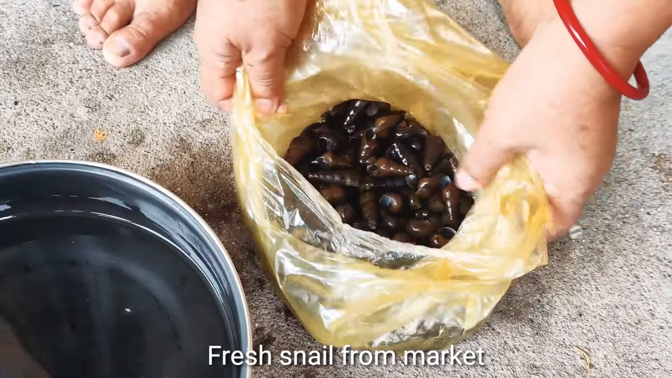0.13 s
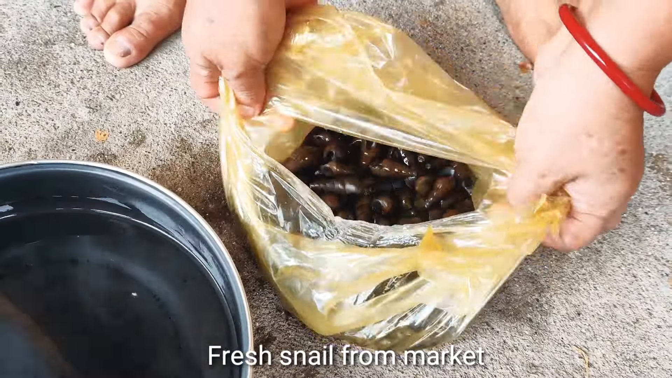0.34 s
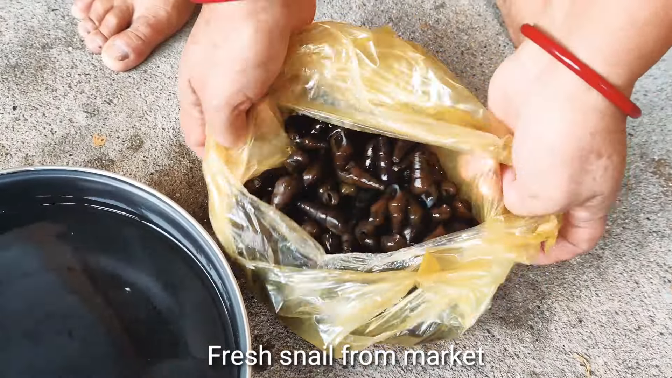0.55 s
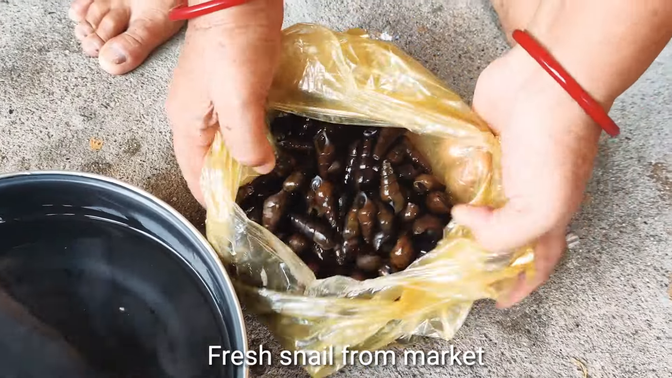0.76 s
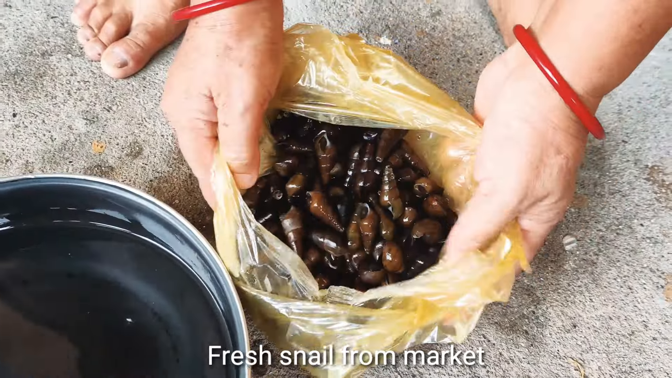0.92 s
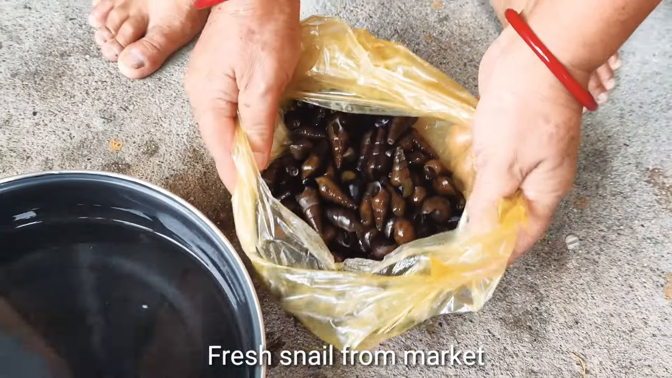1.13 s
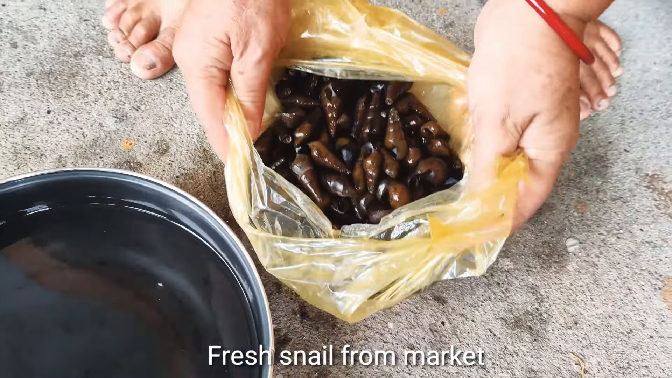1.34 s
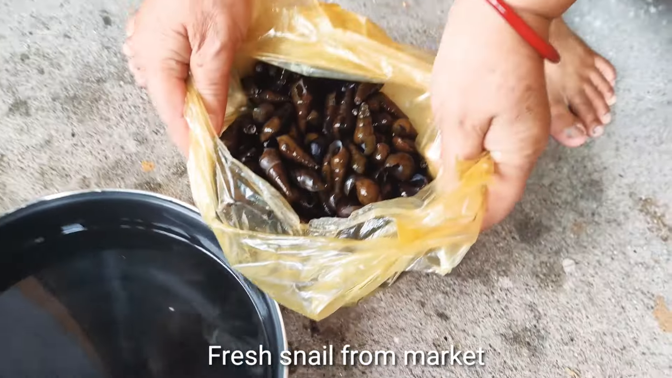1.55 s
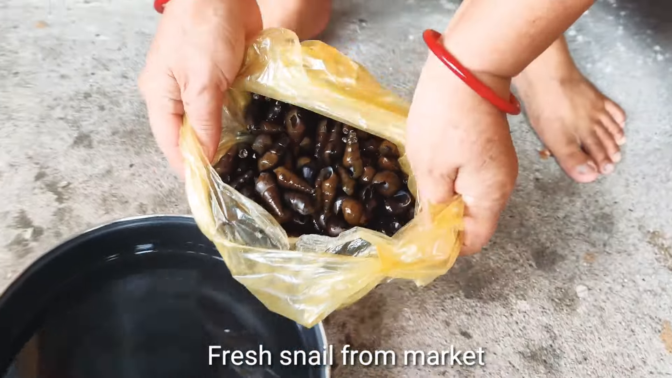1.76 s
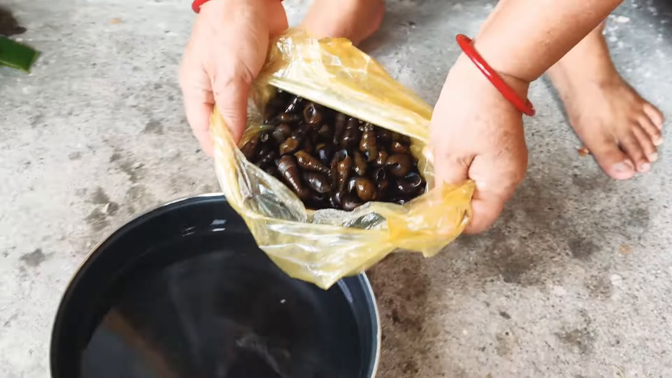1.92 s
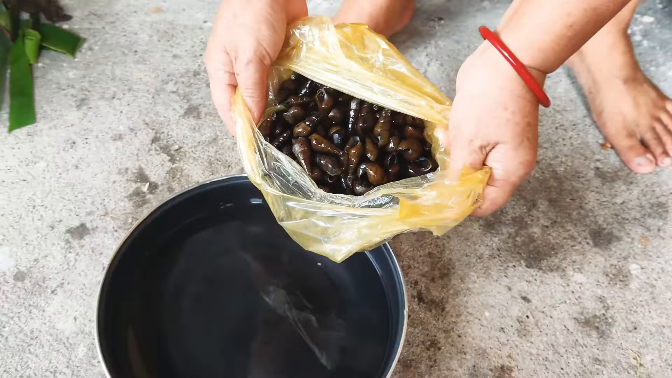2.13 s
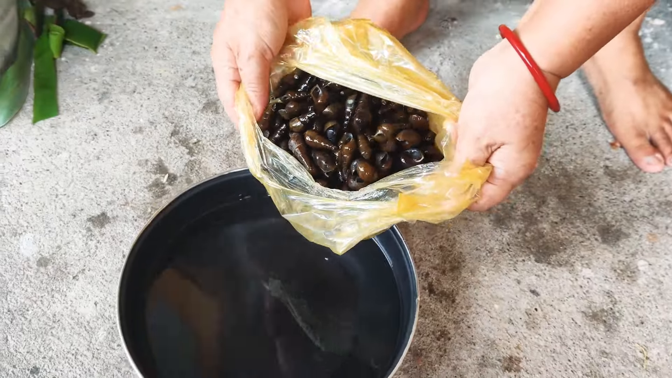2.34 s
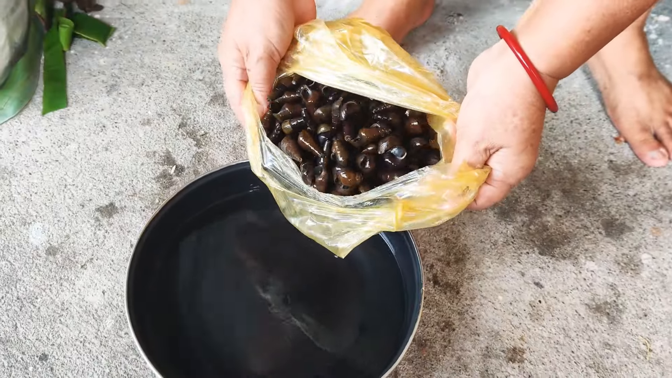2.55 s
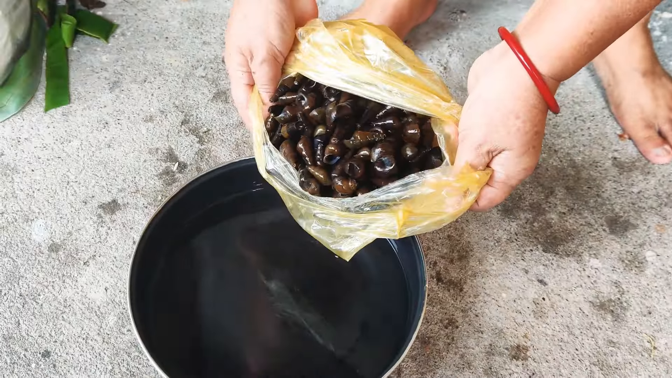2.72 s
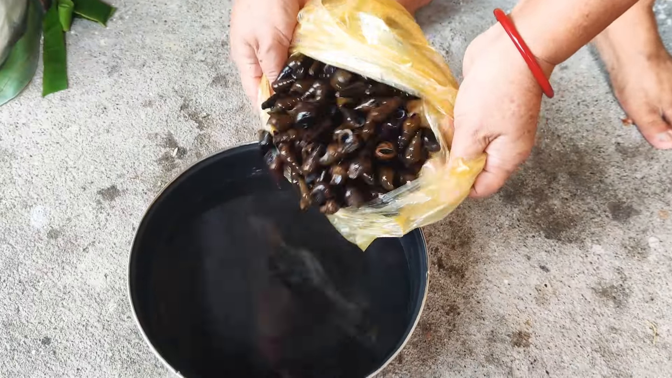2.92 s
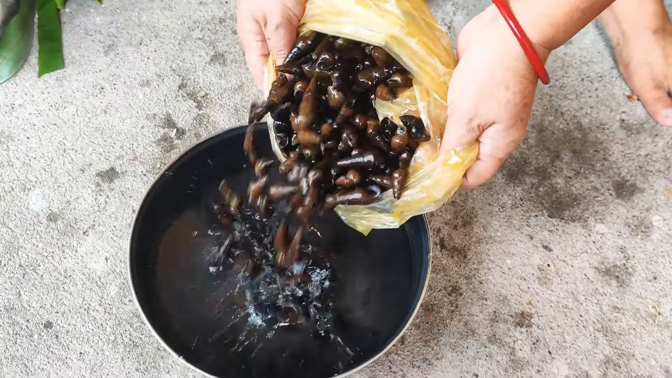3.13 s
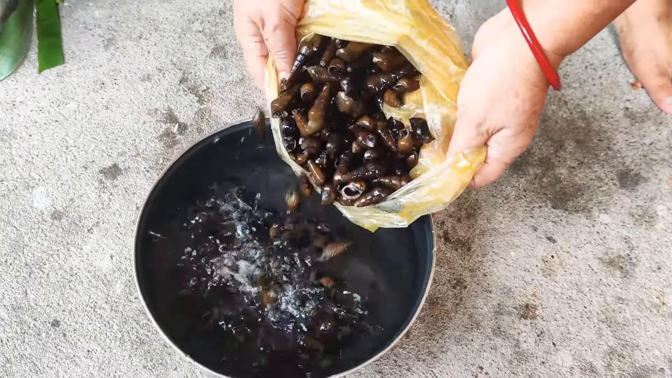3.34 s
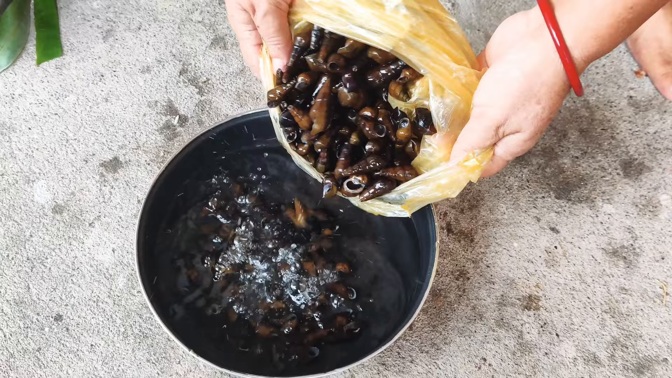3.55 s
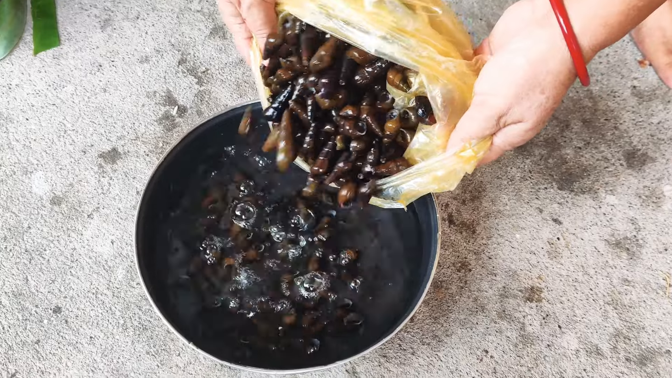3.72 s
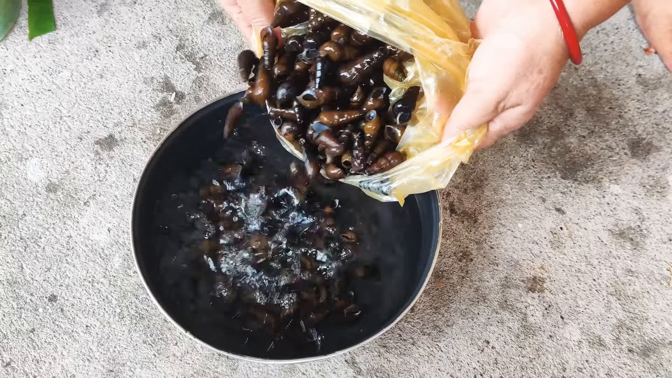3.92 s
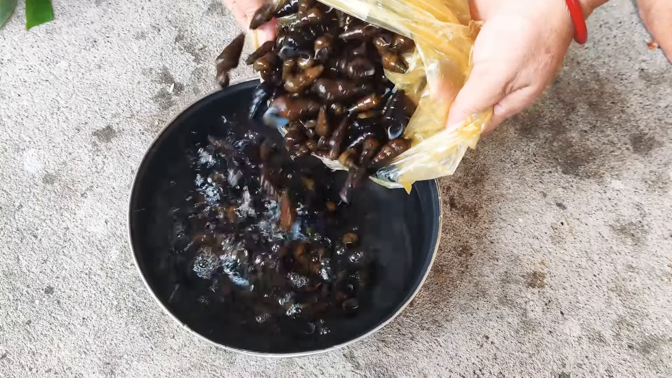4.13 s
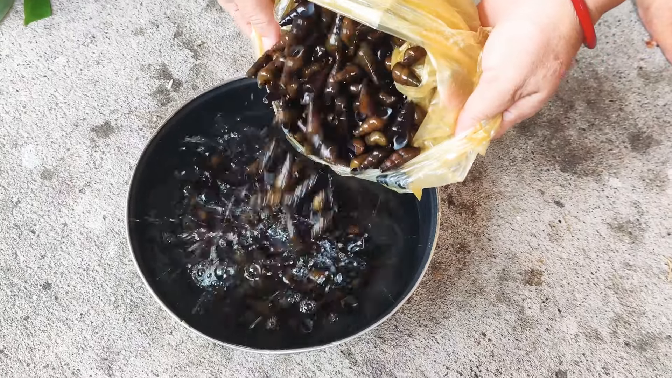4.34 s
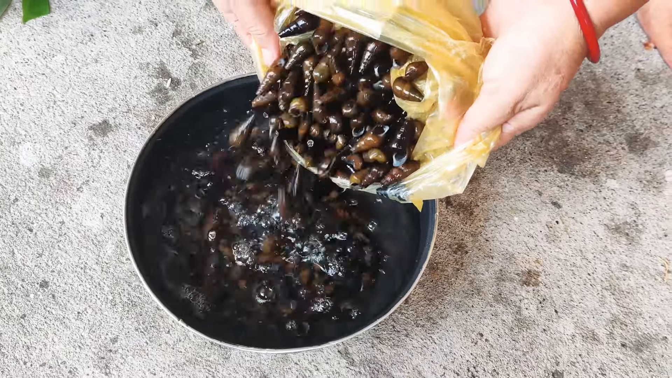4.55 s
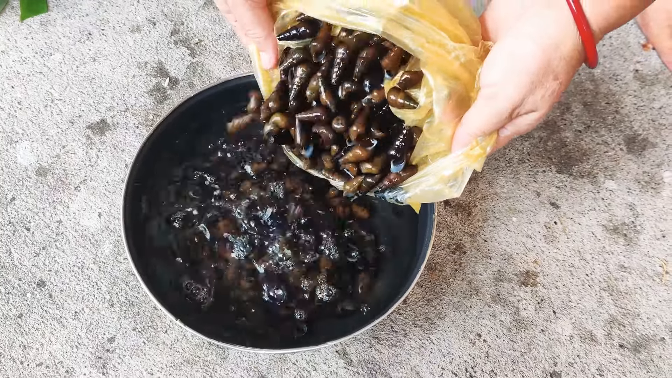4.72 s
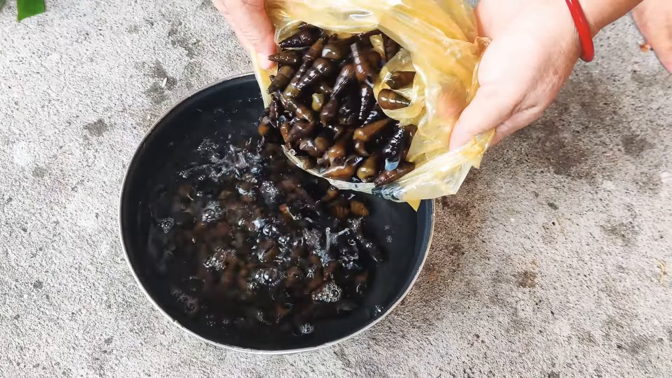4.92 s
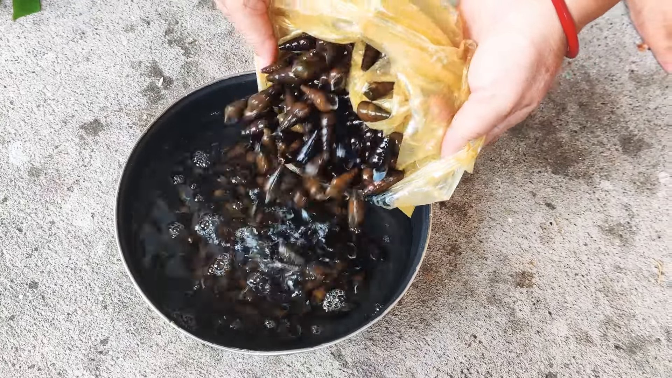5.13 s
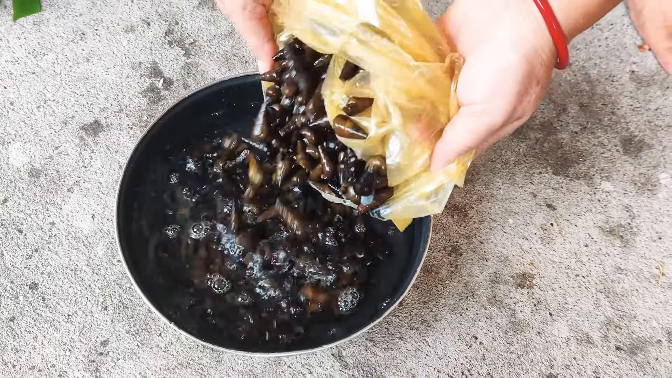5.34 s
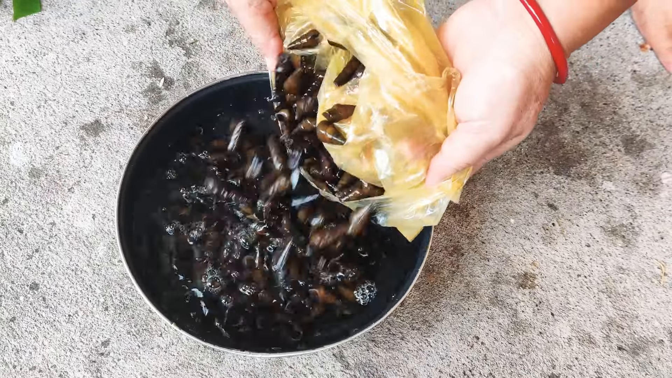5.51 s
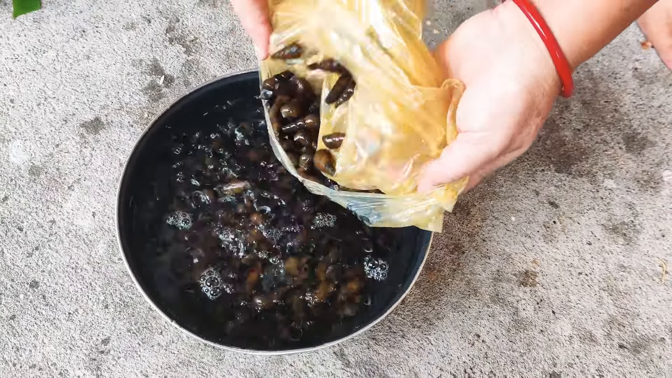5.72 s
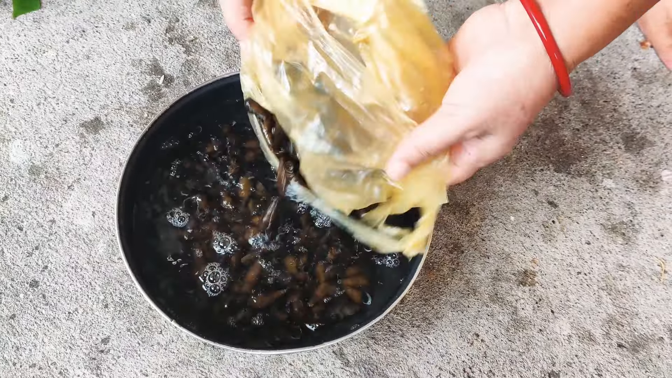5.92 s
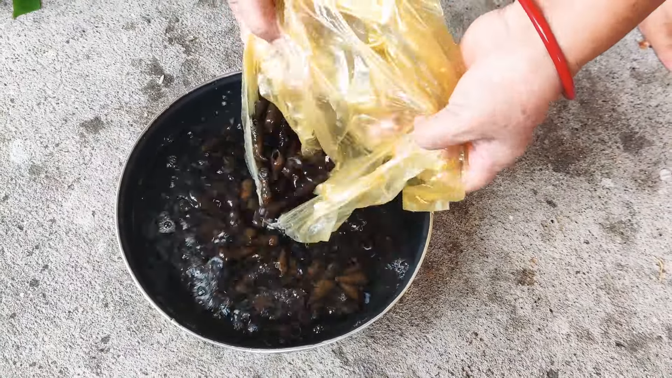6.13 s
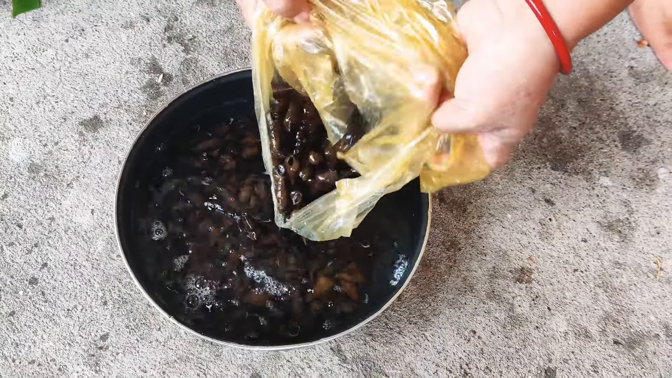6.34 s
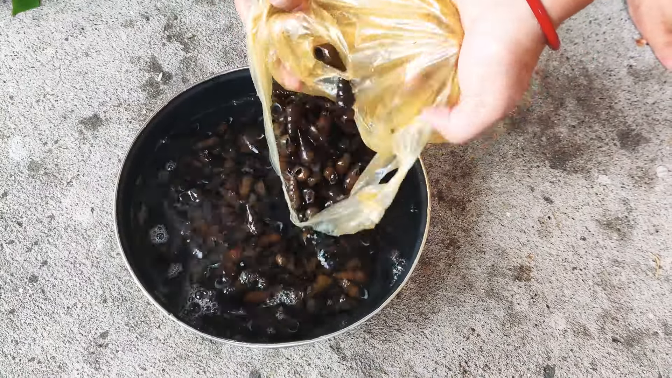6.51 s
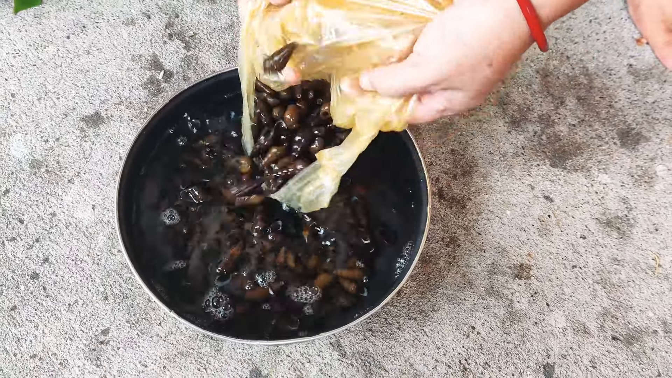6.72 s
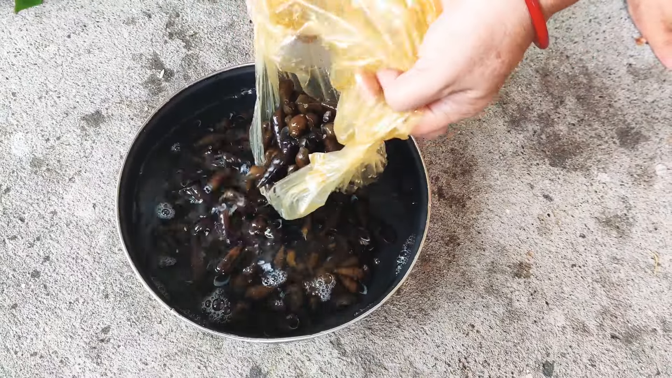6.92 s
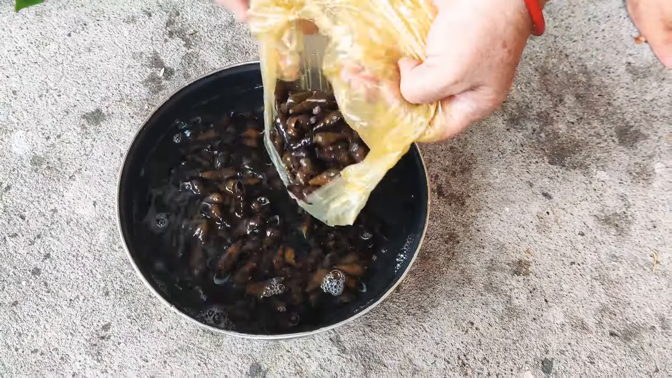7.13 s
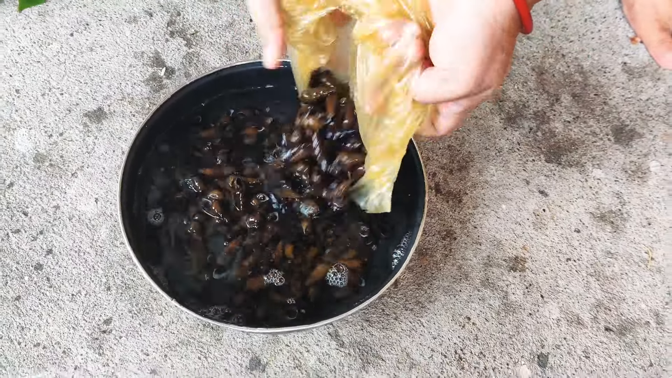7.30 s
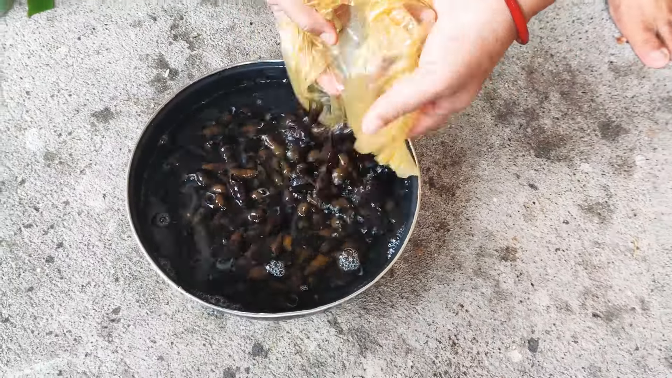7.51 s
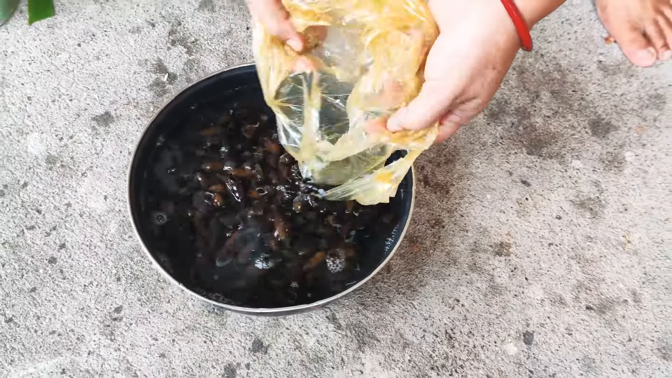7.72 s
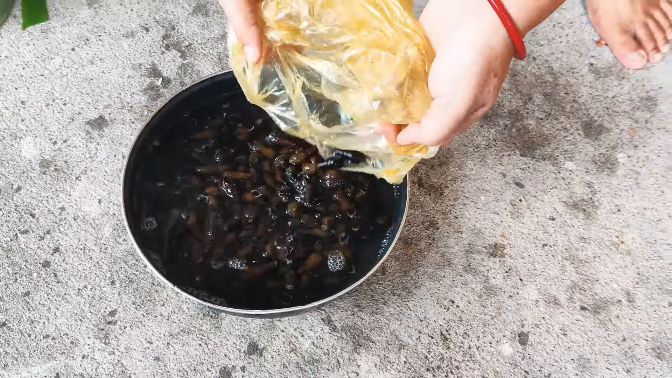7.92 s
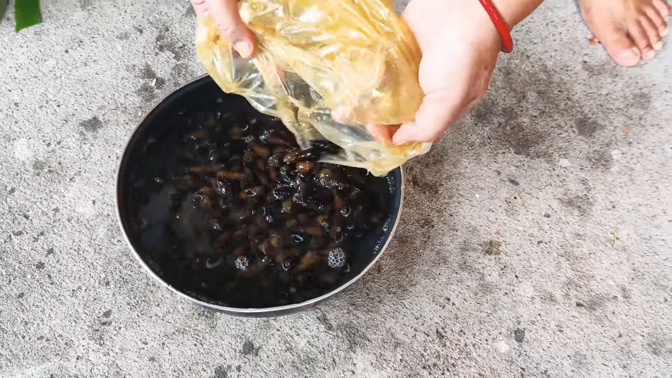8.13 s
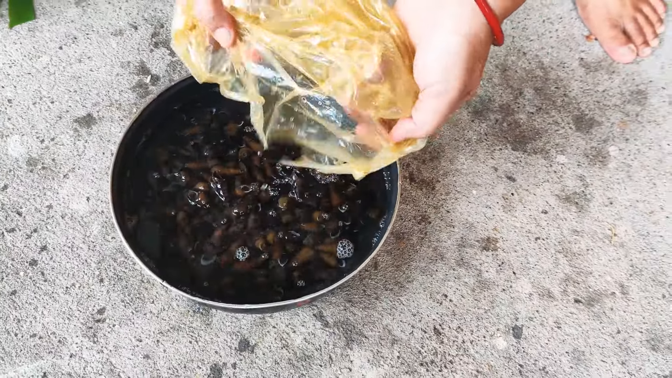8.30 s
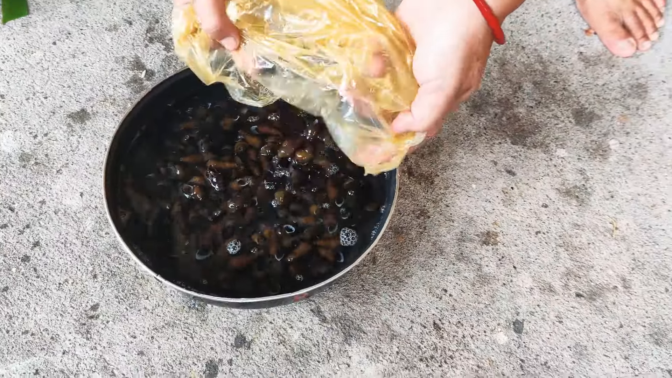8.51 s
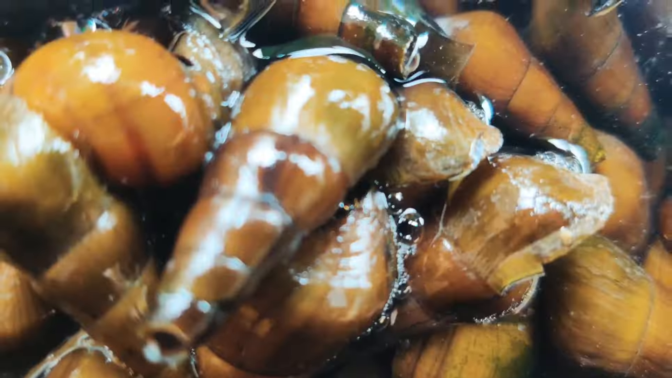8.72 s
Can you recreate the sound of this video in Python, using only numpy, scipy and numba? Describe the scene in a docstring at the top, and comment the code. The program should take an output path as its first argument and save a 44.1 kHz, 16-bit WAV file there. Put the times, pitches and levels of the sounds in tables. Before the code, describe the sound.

Close stereo phone pickup above a concrete floor, with faint low rumble and hum. Quiet plastic crinkling comes first, then a loud, dense, irregular clatter of hard little shells falling into water in a metal bowl, with short wet slaps and rising bubble plops. Then the bag is shaken alone, crackling and snapping, before one more brief rattle of shells and dying rustle.

```python
"""First, close to a phone just above: hands crinkle a thin plastic bag of snails, noise bursts that rustle and snap.
From 3 s they tip it over a steel bowl of water on a concrete floor: ringing bursts clack and slap in showers,
rising sines plop. Past 6 s the film snaps alone, one last handful drops at 7.4 s, and the rustle dies away.
Filtered noise makes a low room rumble throughout; the phone turns its gain down when it gets loud."""
import sys
import numpy as np
from scipy import signal
from scipy.fft import rfft, irfft
from scipy.io import wavfile
from scipy.ndimage import uniform_filter1d
from numba import njit

SR = 44100
rng = np.random.default_rng(int(sys.argv[2]) if len(sys.argv) > 2 else 0)


def transcribe(signal):
    """Save signal, clipped to [-1, 1], as a 16-bit WAV file at the path in sys.argv[1]."""
    frames = np.atleast_2d(signal).T
    limited = np.clip(frames, -1, 1)
    pcm = np.round(limited * 32767).astype(np.int16)
    wavfile.write(sys.argv[1], SR, pcm)


N = 390726  # samples

# handfuls of snails that drop in: (time [s], length [s], rattle level [dB], water level against the rattle [dB])
HANDFULS = [(3.161, 0.13, -12, -16.5), (3.279, 0.13, -15, -6.5), (3.426, 0.0098, -17.5, -3),
            (3.529, 0.024, -18, -11), (3.576, 0.0076, -16.5, -26), (3.695, 0.011, -16.5, -33),
            (3.88, 0.008, -22, -47), (3.92, 0.033, -13.5, -23), (4.022, 0.019, -9, -11),
            (4.062, 0.068, -19, -17), (4.121, 0.035, -25, -1.5), (4.172, 0.031, -11, -15.5),
            (4.225, 0.11, -14.5, -13.5), (4.36, 0.046, -14, -20), (4.442, 0.13, -18.5, -6.5),
            (4.705, 0.028, -19.5, -7.5), (4.827, 0.088, -31, 0), (4.954, 0.084, -18.5, -12.5),
            (5.14, 0.033, -30, -24), (5.193, 0.058, -17.5, -10), (5.28, 0.072, -16.5, -6),
            (5.372, 0.1, -16, -9.5), (5.513, 0.042, -18.5, -10), (5.607, 0.052, -21.5, -12.5),
            (5.68, 0.028, -22.5, -11), (5.749, 0.082, -25, -5), (6.025, 0.083, -23.5, -8.5),
            (6.177, 0.015, -23, -8.5), (7.356, 0.1, -17, -10), (7.454, 0.11, -16, -8.5),
            (7.552, 0.056, -14, -11), (7.61, 0.12, -23.5, -7)]
# stragglers that trickle between the handfuls: (time [s], rattle level [dB])
TRICKLE = [(2.9, -73), (3.1, -28), (3.7, -33.5), (4.3, -29.5), (5.0, -30.5), (5.6, -31), (6.0, -39),
           (7.0, -66)]
# shells that clack apart from the shower: (time [s], level before make-up gain [dB], ring [Hz])
CLACKS = [(3.081, -20, 7060), (3.131, -19.5, 7500), (3.3246, -21, 6950), (3.383, -18, 3360),
          (3.4348, -9, 5270), (3.503, -15.5, 3580), (3.5357, -9.5, 4180), (3.5436, -9, 6050),
          (3.583, -9.5, 5600), (3.6236, -22, 4130), (3.7098, -12, 5800), (3.7602, -19, 5250),
          (3.838, -18, 4100), (3.8555, -18.5, 5000), (3.8814, -8, 7360), (3.9256, -11, 6250),
          (3.939, -10, 4140), (4.002, -7.5, 3900), (4.0273, -9.5, 5100), (4.088, -12, 4350),
          (4.1129, -11, 3320), (4.1826, -11, 5250), (4.2467, -10, 5920), (4.284, -11, 3460),
          (4.343, -13, 7900), (4.364, -12, 7750), (4.496, -12.5, 3550), (4.5452, -9, 5600),
          (4.578, -13.5, 5920), (4.6808, -10, 3540), (4.712, -11, 6450), (4.731, -13.5, 8100),
          (4.833, -16, 6030), (4.846, -19, 3620), (4.8635, -21, 3400), (4.8757, -12, 6150),
          (4.8896, -11, 3500), (4.9347, -22, 6370), (4.968, -18, 3430), (4.9825, -11.5, 7100),
          (5.005, -15.5, 3970), (5.025, -11, 5170), (5.1455, -13, 5150), (5.1938, -13.5, 7300),
          (5.204, -22, 7600), (5.2302, -14.5, 3150), (5.2354, -11, 7600), (5.286, -10, 7550),
          (5.316, -12, 3730), (5.337, -11.5, 2850), (5.4, -13.5, 3100), (5.4299, -17, 7600),
          (5.4725, -12.5, 7460), (5.583, -13, 8440), (5.6453, -18, 6090), (5.657, -21, 6900),
          (5.687, -21, 6830), (5.7563, -13.5, 3860), (5.8156, -13.5, 4720), (7.375, -15.5, 7300),
          (7.395, -14, 3330), (7.4102, -14, 7360), (7.457, -11, 7300), (7.518, -12, 8100),
          (7.569, -14, 7490), (7.709, -19, 3870)]
# single bubbles: (time [s], level before make-up gain [dB], pitch a quarter of the way through [Hz])
PLOPS = [(3.556, -27, 804), (3.584, -29, 1280), (3.588, -30.5, 816), (3.708, -34, 570), (4.029, -22, 920),
         (4.111, -19, 1980), (4.117, -22, 935), (4.272, -26, 874), (4.324, -19, 1950), (4.34, -24, 1390),
         (4.478, -22, 1400), (4.5, -23.5, 756), (4.632, -25, 2030), (4.833, -17, 2340), (4.889, -33.5, 733),
         (4.934, -28, 1080), (4.973, -26, 1480), (5.24, -16, 2200), (5.812, -25, 1640), (6.878, -28, 2030),
         (7.601, -32, 1470), (7.535, -23, 1260), (7.66, -19, 2980), (7.724, -22, 2240)]
# resonances of the steel bowl: (frequency [Hz], width [Hz], relative level [dB])
BOWL_RINGS = [(3397, 65, 7.5), (3940, 370, 4), (5440, 210, -4.5)]
# the growing heap of shells damps the bowl: (time [s], ring level before a fixed 5 dB cut [dB])
HEAP_DAMPING = [(4.5, 1.5), (5.8, 0), (7.4, -7)]
# colour of the shells: (frequency [Hz], relative level per Hz [dB])
SHELL_COLOUR = [(290, -56), (500, -19), (868, -11), (1570, -14.5), (3390, -1.5), (3750, -7.5), (6420, -1),
                (13100, -8), (14700, -12), (16000, -14)]
# colour of the water slaps: (frequency [Hz], relative level per Hz [dB])
SLAP_COLOUR = [(300, -14), (700, -5.5), (2000, 4), (4000, 0.0)]
# steady handling of the bag: (time [s], rustle level [dB])
HANDLING = [(0.0, -36), (0.13, -44.5), (0.25, -29.5), (0.89, -30.5), (1.17, -43.5), (1.37, -46),
            (1.45, -39.5), (1.75, -40), (2.03, -46), (2.44, -44.5), (2.91, -35.5), (3.0, -25.5),
            (3.48, -25.5), (3.8, -34), (3.98, -26), (4.63, -25.5), (4.8, -34.5), (5.1, -27), (5.87, -29),
            (6.42, -26.5), (6.59, -30.5), (6.93, -27), (6.98, -36), (7.04, -28), (7.33, -27.5),
            (7.78, -33.5), (8.17, -36), (8.35, -45.5), (8.85, -62)]
# short tugs that swell the rustle: (time of the crest [s], level [dB])
TUGS = [(0.36, -25), (0.41, -29.5), (0.56, -26), (1.61, -51), (1.84, -30.5), (2.18, -39.5), (2.28, -36.5),
        (2.49, -38), (2.61, -31), (2.81, -46), (6.06, -37), (6.2, -37), (6.71, -30), (6.899, -24.5),
        (7.02, -32), (7.12, -27), (8.42, -36), (8.54, -35), (8.61, -37.5), (8.698, -35.5), (8.82, -44.5)]
# creases that snap: (time [s], level before make-up gain [dB], ring [Hz])
SNAPS = [(0.2368, -23.5, 6660), (0.351, -25, 8440), (0.5923, -27, 7080), (0.7405, -22.5, 5560),
         (0.832, -35, 7000), (0.847, -34, 6000), (1.839, -28, 5700), (2.3398, -30.5, 6900),
         (2.6143, -24, 6830), (2.6252, -26, 6900), (2.736, -29, 7340), (2.8532, -24.5, 6460),
         (2.9224, -33, 7560), (2.9273, -26.5, 6400), (5.9907, -12, 7800), (6.002, -18, 7170),
         (6.029, -13, 5850), (6.0712, -13, 7240), (6.1404, -20, 7540), (6.1863, -16, 6760),
         (6.2078, -20, 6650), (6.388, -23, 7040), (6.615, -21, 6840), (6.6443, -22, 7390),
         (6.664, -19.5, 6330), (6.6797, -19, 6140), (6.6998, -19, 7500), (6.726, -12, 7540),
         (6.8213, -21, 6960), (6.8937, -11.5, 7200), (6.928, -11.5, 6140), (6.998, -24, 7500),
         (7.0298, -10.5, 6260), (7.0652, -17, 7440), (7.108, -19, 6640), (7.1288, -18, 3900),
         (7.7334, -11.5, 6850), (7.786, -20, 6130), (7.7912, -18.5, 7150), (7.8594, -16.5, 5260),
         (7.9498, -24.5, 7600), (7.9684, -28, 7670), (8.519, -13.5, 8200), (8.543, -27, 6100),
         (8.692, -28, 3830)]
# thuds of the load shifting in the bag: (time [s], level at a rustle of -36.5 dB [dB])
LOAD_THUDS = [(0.3, -43.5), (0.55, -42), (0.8, -48.5), (1.6, -42.5), (2.3, -45.5), (4.0, -55), (6.5, -50),
              (8.8, -47.5)]
# colour of the plastic film: (frequency [Hz], relative level per Hz [dB])
FILM_COLOUR = [(710, -12.5), (1200, -7), (2230, -1), (2730, -3), (3430, -4), (6580, -3.5), (14800, -8),
               (16000, -2.5)]
# colour of the thuds: (frequency [Hz], relative level per Hz [dB])
THUD_COLOUR = [(100, -4), (250, -5), (600, -2.5), (900, -1), (1400, -8.5), (2200, 0), (4000, -10.5)]
# colour of the room rumble: (frequency [Hz], relative level per Hz [dB])
ROOM_COLOUR = [(12, -17), (20, 9), (86, -3), (234, -14), (359, -14), (445, -17.5), (933, -20.5),
               (1130, -29), (1270, -19.5), (6000, -37.5), (7800, -30), (13200, -120)]
# colour of the hum: (frequency [Hz], relative level per Hz [dB])
HUM_COLOUR = [(70, -35), (86, 3), (96, 0.0), (115, -45.5)]
# tone balance of the phone's two microphone ports: (frequency [Hz], left minus right [dB])
PORT_BALANCE = [(60, -3), (150, -2.5), (350, 0), (700, 4.5), (1300, 4), (2400, -.5), (4400, -5), (7000, -5),
                (10500, 0), (14000, 1.5)]

CLACK_T60_S, SNAP_T60_S = 0.038, 0.044  # at 5 kHz
DAMPING_POWER = 0.15  # higher rings die sooner
SLAP_SPREAD_DB = 4.0
TUG_RISE_DB_S, TUG_FALL_DB_S = 212, 142
THUD_SLOPE = 0.81  # dB of thud per dB of rustle
TICKS_DB = -15  # against the crackle
BAG_PAN_DB = -2  # left minus right
ROOM_DB, HUM_SWELL_DB = -47, 2.5  # the swell is per unit of the slow random curve
RIGHT_LAG = 4  # samples
ALIKE_HZ = 810  # well above this the two ports hear mostly unrelated detail
TOP_HZ = 15800
CEILING = 0.8  # full scale is 1


def snails():
    """Shells rattle and ring the bowl; water slaps and small bubbles follow how wet each handful is."""
    shell = noise(SHELL_COLOUR, lag=RIGHT_LAG)
    rattle = swarm(shell, 2450.0, 8800.0, 0.042, 2.3, 0.18, 0.68, count=6000)
    slaps = swarm(noise(SLAP_COLOUR), 430.0, 3500.0, 0.12, SLAP_SPREAD_DB, 0.98, 0.13, count=1500)

    when, chance, pitch = rng.random((800, 3)).T
    fizz_size = sizes(chance, 2.8) * (0.4 + pitch)
    fizz = bubbles(when * N / SR, fizz_size, 750 * 4.5 ** pitch, 8.6, 0.4)

    dry, wet = handfuls(tail_t60=0.16)
    rattle_gain = np.hypot(dry, undb(curve(TRICKLE, 1)))
    clacks = typed(shell, CLACKS, CLACK_T60_S, 4.4, 0.4, 0.52, crack=0.85)
    hits = rattle_gain * rattle + wet * slaps + clacks
    ring = bowl(hits)

    at, db, hz = np.transpose(PLOPS)
    plops = bubbles(at, undb(db + 5.5), hz, 32.4, 0.31)
    water = wet * level(fizz, -9.5) + plops
    # the bowl lies nearer the left port, so the right hears it a little late
    return hits + ring + np.array([water, np.roll(water, RIGHT_LAG)])


def handfuls(tail_t60):
    """Each handful lands at once, streams for its length and dies away: gains for the rattle and the water."""
    t, gains = np.arange(N) / SR, np.zeros((2, N))
    for at, length, db, wet_db in HANDFULS:
        on = slice(int(at * SR), int((at + length + tail_t60) * SR))
        onset = np.clip((t[on] - at) / 0.0047, 0, 1)
        tail = undb(-60 * np.maximum(t[on] - at - length, 0) / tail_t60)
        # overlapping handfuls add in power
        gains[:, on] = np.hypot(gains[:, on], onset * tail * undb([[db], [db + wet_db]]))
    return gains


def bowl(hits):
    """The blows excite the steel's narrow resonances, weaker as shells heap up."""
    ring = 0
    for hz, width_hz, db in BOWL_RINGS:
        ring = ring + undb(db) * signal.lfilter(*signal.iirpeak(hz, hz / width_hz, SR), hits)
    return undb(curve(HEAP_DAMPING, 1) - 5.0) * ring


def bag():
    """Dense crackle of the film with tiny ticks in it, duller thuds of the load shifting, and the lone snaps."""
    film = noise(FILM_COLOUR)
    crackle = swarm(film, 2740.0, 10100.0, 0.055, 2.0, 0.12, 1.0, count=9000)
    thuds = swarm(noise(THUD_COLOUR), 159.0, 910.0, 0.14, 4.5, 0.43, 0.65, count=1500)
    ticks = swarm(film, 5700.0, 13000.0, 0.011, 4.0, 0.4, 0.5, count=450)
    snaps = typed(film, SNAPS, SNAP_T60_S, 1.0, 0.23, 0.5, crack=2.07)

    db = rustle_db()
    thud_db = curve(LOAD_THUDS, 1) + THUD_SLOPE * (db + 36.5)
    rustle = undb(db) * (crackle + undb(TICKS_DB) * ticks)
    return rustle + undb(thud_db) * thuds + snaps


def rustle_db():
    """The steady handling with each tug's quick swell and fade added in power."""
    t, power = np.arange(N) / SR, undb(2 * curve(HANDLING, 1))
    for at, db in TUGS:
        on = slice(int((at - 0.2) * SR), int((at + 0.3) * SR))
        late = t[on] - at
        slope_db = np.minimum(TUG_RISE_DB_S * late, -TUG_FALL_DB_S * late)
        power[on] += undb(2 * (db + slope_db))
    return 10 * np.log10(power)


def room():
    """Low rumble and a hum near 90 Hz, both noise that swells and fades slowly."""
    step = int(0.35 * SR)
    steps = np.repeat(rng.standard_normal((2, N // step + 1)), step, axis=1)
    swell = uniform_filter1d(steps, step)[:, :N]
    hum = noise(HUM_COLOUR) * undb(-8.0 + HUM_SWELL_DB * swell[1])
    rumble = noise(ROOM_COLOUR) * undb(0.45 * swell[0])
    return level(rumble + hum, ROOM_DB)


def swarm(grit, lo_hz, hi_hz, t60, spread_db, width, broad, count):
    """Blows at random moments, each with its own size and ring, brought to an overall level of 0 dB."""
    when, chance, pitch = rng.random((count, 3)).T
    hz = lo_hz * (hi_hz / lo_hz) ** pitch
    fall = np.full(count, t60)
    out = bursts(grit, when * N / SR, sizes(chance, spread_db), hz, fall, width, broad, 0.51, 0.4)
    return level(out, 0)


def typed(grit, rows, t60, gain_db, width, broad, crack):
    """The blows of a table, higher rings dying sooner; gain_db makes up for the rounded attack."""
    at, db, hz = np.transpose(rows)
    fall = np.clip(t60 * (5000 / hz) ** DAMPING_POWER, 0.005, 0.2)
    return bursts(grit, at, undb(db + gain_db), hz, fall, width, broad, 0.98, crack)


@njit
def bursts(grit, at, size, hz, t60, width, broad, rise, crack):
    """Each blow is a bright crack and a dying spurt of noise, part plain, part through the ring of the piece hit."""
    out = np.zeros_like(grit)
    for e in range(len(at)):
        start, length = int(at[e] * SR), int(t60[e] * SR)
        fall = np.exp(-np.log(1000) / (t60[e] * SR))
        g = np.tan(np.pi * hz[e] / SR)
        for c in range(2):
            band, low = 0., 0.  # memory of the resonant filter
            slow, quick, tick = size[e], size[e], crack * size[e]
            for i in range(start, min(N, start + length)):
                j = (i + 7919 * e) % N  # each blow reads another stretch of noise
                x = grit[c, j] * (slow - quick + tick)
                v = (band + g * (x - low)) / (1 + g * (g + width))
                band, low = 2 * v - band, low + 2 * g * v
                # the slope of the noise gives the crack its treble
                treble = 0.5 * tick * (grit[c, j] - grit[c, j - 1])
                out[c, i] += broad * x + np.sqrt(width) * v + treble
                slow, quick, tick = slow * fall, quick * rise, tick * 0.96
    return out


@njit
def bubbles(at, size, hz, cycles, glide):
    """Sines that swell and fade while the pitch climbs as the bubble nears the surface."""
    out = np.zeros(N)
    for e in range(len(at)):
        start, n, phase = int(at[e] * SR), int(cycles * SR / hz[e]), 0.
        for i in range(min(n, N - start)):
            phase += 2 * np.pi * hz[e] * (1 + glide * (i / n - 0.25)) / SR
            envelope = np.exp(-4. * i / n) * min(1., 8. * i / n)
            out[start + i] += size[e] * np.sin(phase) * envelope
    return out


def sizes(chance, spread_db):
    """Many small, few large, none huge."""
    return undb(-spread_db * np.log(0.11 + chance))


def noise(points, lag=0):
    """Coloured noise for both ports, shared in the bass and a little in the treble; the right may be late."""
    mid, side = rfft(rng.standard_normal((2, N)))
    hz = np.arange(N // 2 + 1) * SR / N
    alike = np.clip(0.13 + 0.82 / (1 + (hz / ALIKE_HZ) ** 2), 0, 0.99)
    pair = np.sqrt(1 + alike) * mid + np.sqrt(1 - alike) * side * np.array([[1], [-1]])
    left, right = level(irfft(pair * on_hz(points), N), 0)
    return np.array([left, np.roll(right, lag)])


def on_hz(points):
    """A (frequency [Hz], level [dB]) table as gains on the spectrum's bins."""
    hz, db = np.transpose(points)
    return undb(np.interp(np.log(np.arange(N // 2 + 1) * SR / N + 1), np.log(hz), db))


def curve(rows, column):
    """One column of a table, joined by straight lines over time."""
    rows = np.array(rows)
    return np.interp(np.arange(N) / SR, rows[:, 0], rows[:, column])


def undb(db):
    """Decibels as an amplitude ratio."""
    return 10 ** (np.asarray(db) / 20)


def level(x, db):
    """Scale a sound to an RMS level in dB."""
    return x * undb(db) / np.sqrt(np.mean(x ** 2))


@njit
def follow(x, attack, release):
    """Envelope that rises fast and falls slowly."""
    y, e = np.empty(len(x)), x[0]
    for i in range(len(x)):
        e += (x[i] - e) * (attack if x[i] > e else release)
        y[i] = e
    return y


def scene():
    """The bag leans to the right, over the snails in the bowl and the room."""
    bag_pan = undb([[BAG_PAN_DB / 2], [-BAG_PAN_DB / 2]])
    return bag() * bag_pan + snails() + room()


def record(dry):
    """The two ports colour the sound differently; gain ducks when loud, peaks are rounded, the top is cut."""
    tilt = np.sqrt(on_hz(PORT_BALANCE))
    heard = irfft(rfft(dry) * np.array([tilt, 1 / tilt]), N)
    # 4.6 ms attack, 0.3 s release, one gain for both ports above -34 dB
    loud = follow(np.abs(heard).mean(axis=0), 1 / (0.0046 * SR), 1 / (0.3 * SR))
    heard = heard * np.minimum(1, (undb(-34) / (loud + 1e-9)) ** 0.21)
    rounded = CEILING * np.tanh(heard / CEILING)
    top_cut = signal.ellip(12, 0.2, 100, TOP_HZ, fs=SR, output="sos")
    return signal.sosfilt(top_cut, rounded)


dry = scene()
out = record(dry)
transcribe(out)
```